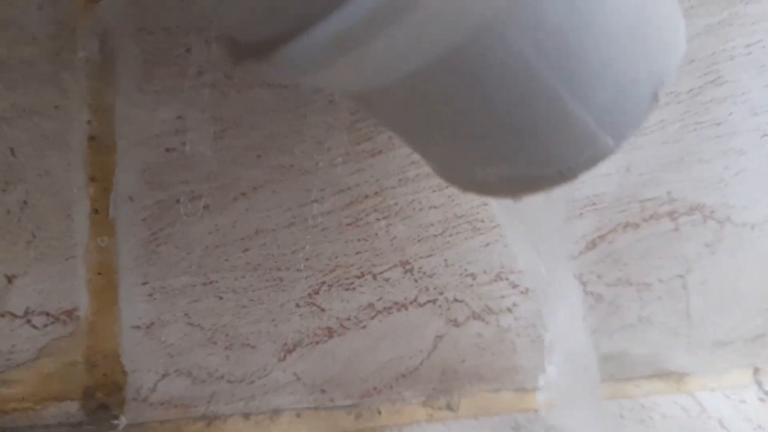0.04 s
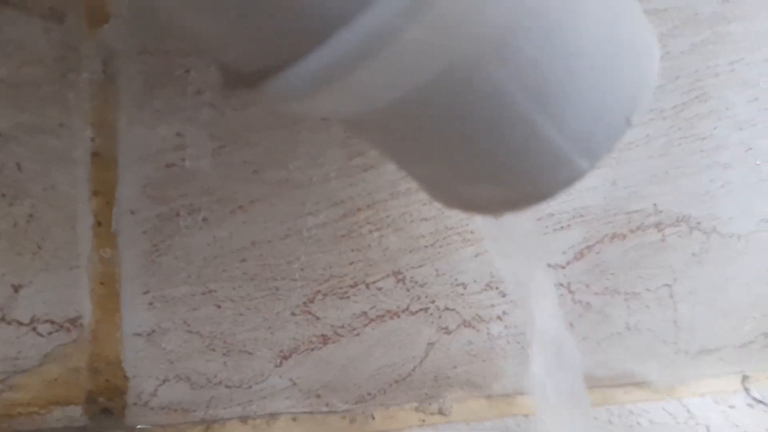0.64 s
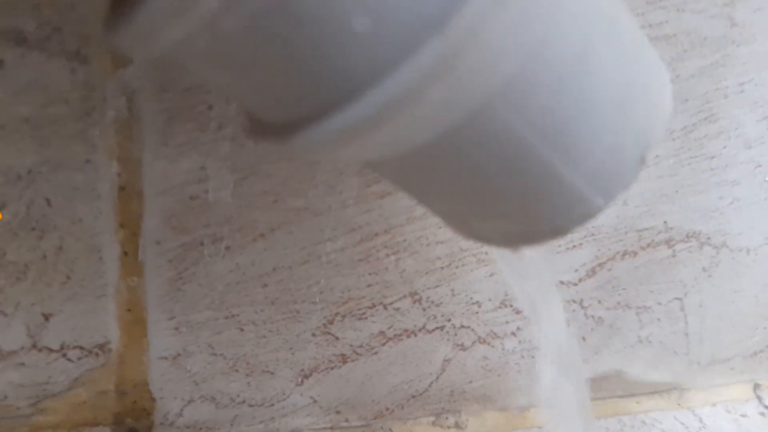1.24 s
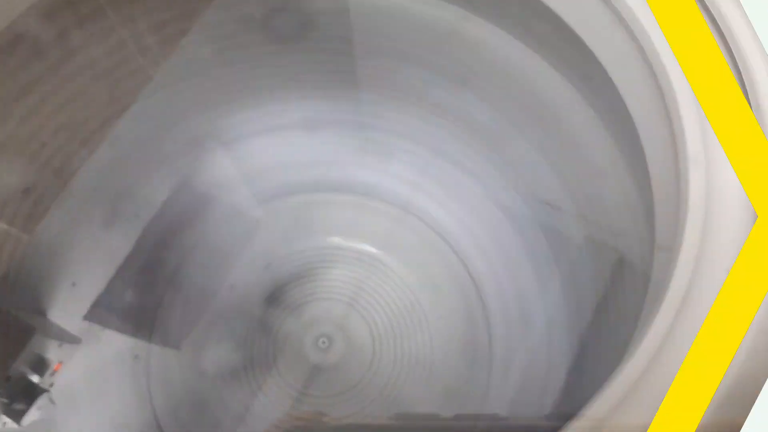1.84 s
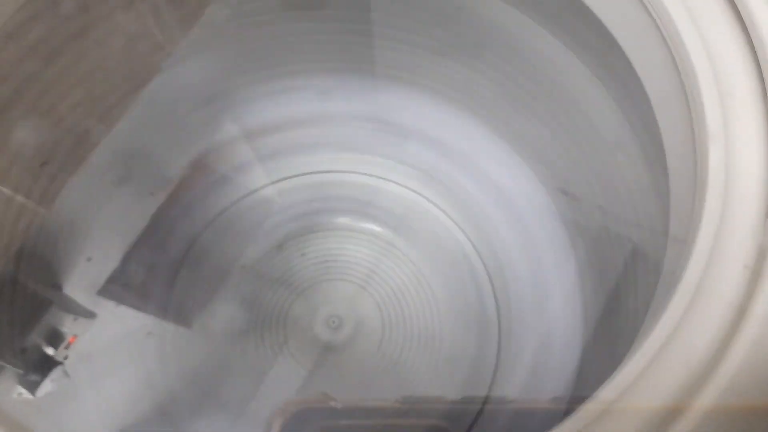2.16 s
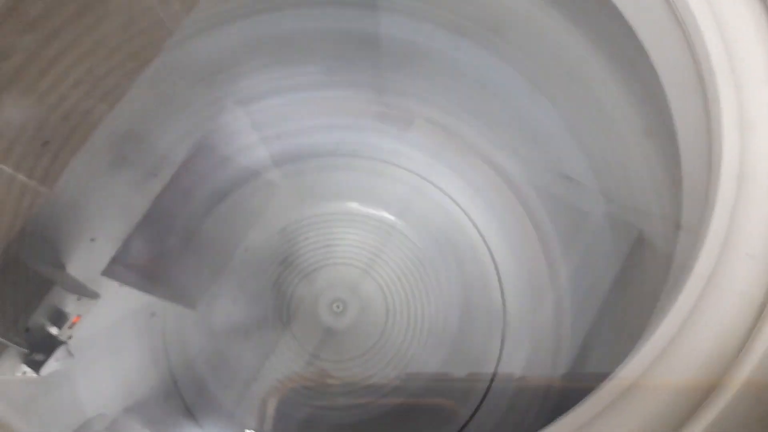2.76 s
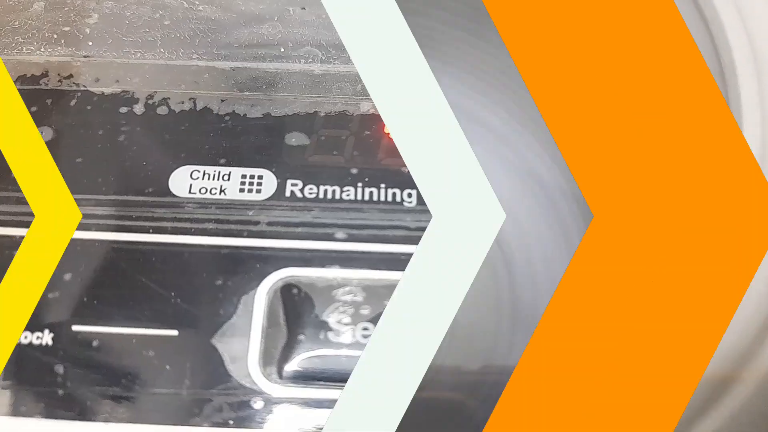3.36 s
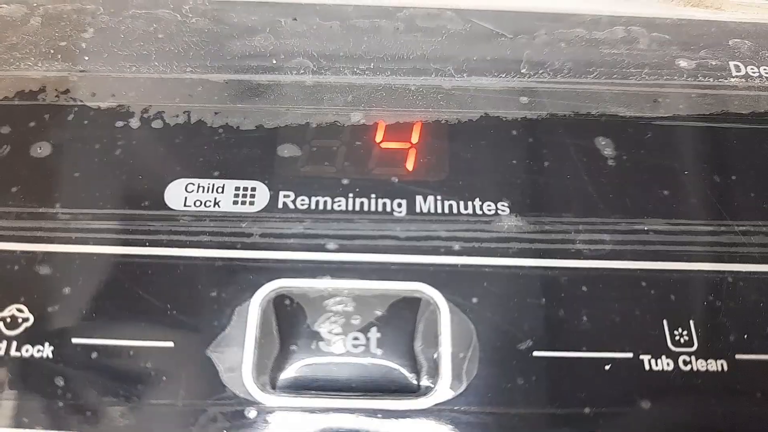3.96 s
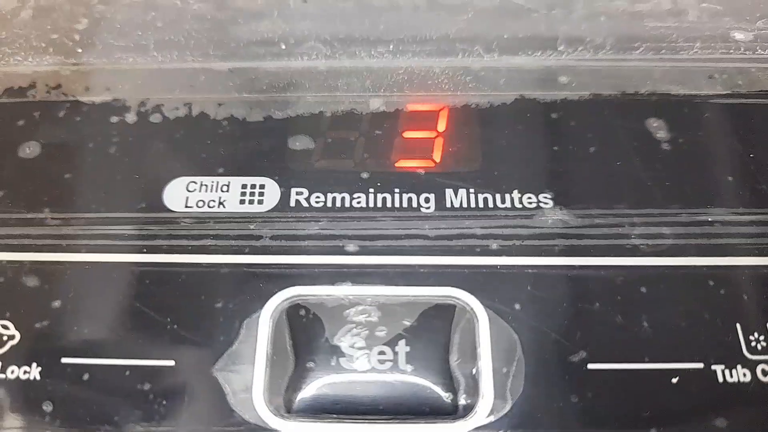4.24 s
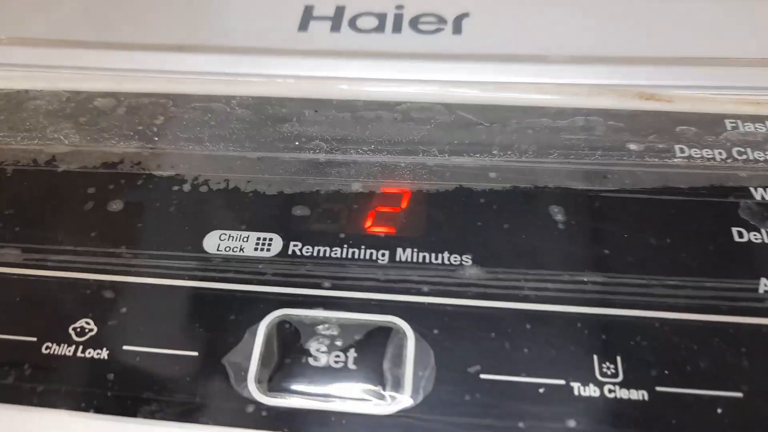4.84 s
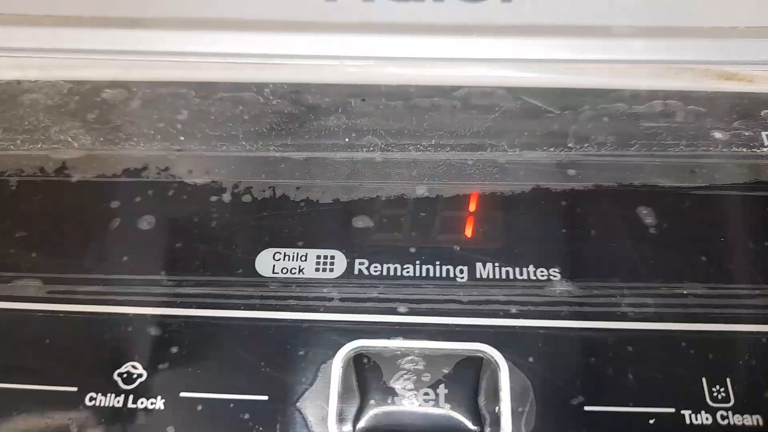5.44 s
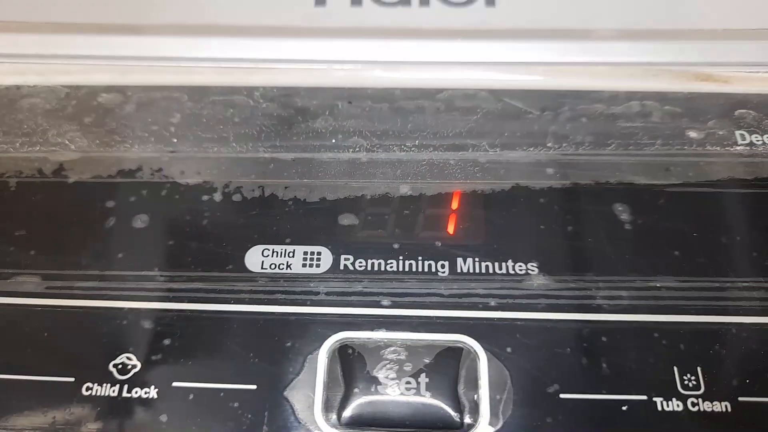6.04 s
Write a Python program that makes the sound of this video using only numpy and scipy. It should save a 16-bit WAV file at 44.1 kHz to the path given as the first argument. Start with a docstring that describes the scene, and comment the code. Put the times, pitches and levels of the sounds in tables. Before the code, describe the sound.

At first the microphone is at the drain pipe of a spinning washing machine: water splashes onto the floor over a low drone and a fast, pulsing rattle. At about 1 second the pipe gives a hollow clonk and the machine lands with a heavy thud, with a short surge of spray and rattle. Several lighter thuds follow until 1.6 seconds. Between 1.5 and 2 seconds the sound fades to the open drum: a steady motor hum, a drum drone and a wavering cabinet vibration. Around 3.5 seconds the tone shifts as the microphone reaches the control panel, and the drone grows a little stronger. At 4.7 seconds the sound drops out for an instant between two ticks, then the hum resumes. At 5.5 seconds a sharp click starts a much louder, closer, wider hum, which lasts to the end, with faint thin squeals around 6 seconds.

```python
"""At the drain pipe of a spinning top-loading washing machine, water splashes out, the pipe clonks and
the machine thuds and rocks. We then listen over the open drum, at the control panel and further back.
The off-balance drum drones, the motor hums with the mains power, and both shake the cabinet.
The sound drops out for an instant, and near the end it jumps to a much louder, closer hum."""
import sys
import numpy as np
from scipy import signal
from scipy.fft import rfft, irfft, next_fast_len
from scipy.io import wavfile

SR = 44100
rng = np.random.default_rng(int(sys.argv[2]) if len(sys.argv) > 2 else 0)


def unload_wav(signal):
    """Save mono or channel-first audio to the path in sys.argv[1] as 16-bit WAV at rate SR, clipped to [-1, 1]."""
    wavfile.write(
        sys.argv[1],
        SR,
        np.round(np.clip(np.atleast_2d(signal).T, -1, 1) * 32767).astype(np.int16),
    )


N = 268436
T = np.arange(N) / SR

# The five listening places, in order: drain pipe, over the drum, control panel, further back, close up.
# fades from the first place to the second, and on to the third: (middle [s], length [s])
PLACE_FADES = [(1.742, 0.51), (3.45, 0.73)]
DROPOUT_S = (4.6726, 4.7058)   # start and end; halfway through, we move further back
CLOSE_UP_S = 5.4725

# hiss that both ears share: (frequency [Hz], relative level [dB])
HISS_COLOUR = [(30, -2.5), (3000, -1), (8000, 2.5), (12000, 0.5), (16000, -2)]
# hiss that differs between the ears: (frequency [Hz], relative level [dB])
HISS_SIDE_COLOUR = [(3500, -51), (5500, -3), (8000, -0.5), (16000, -2.5)]
# squeals of the moving parts: (middle [s], half length [s], pitch [Hz], width [Hz], level [dB])
GEAR_SQUEALS = [(4.03, .16, 3130, 70, -68), (5.93, .035, 3780, 90, -55), (5.94, .06, 3530, 70, -58),
                (5.93, .06, 4530, 90, -61), (6.03, .045, 2650, 250, -48)]
# splashing water: (frequency [Hz], relative level [dB])
WATER_COLOUR = [(500, 4.5), (1000, -7.5), (1700, 1.5), (2400, -0.5), (3200, -1.5), (4400, -7),
                (5500, -10.5), (7500, -20), (15000, -31)]
# bursts of spray and small ticks: (time [s], level [dB], centre [Hz], rise and fall time [s])
SPRAY_BURSTS = [(1.046, -51, 2980, 0.014), (1.057, -53, 6000, 0.004), (1.075, -39, 3070, 0.0075),
                (1.076, -48, 5740, 0.0057), (1.086, -41, 1600, 0.0097), (1.173, -39.5, 1550, 0.0064),
                (1.25, -51, 3500, 0.0081), (1.263, -54, 7000, .003), (1.46, -59, 7000, 0.0044),
                (2.938, -58, 4970, 0.02), (4.176, -50.5, 3800, 0.0027)]
# rattle heard through the drain pipe: (frequency [Hz], relative level [dB])
RATTLE_COLOUR = [(25, -40), (50, -25), (85, 3.5), (130, -5.5), (195, -11), (235, -2.5), (300, -6.5),
                 (375, -7), (480, -15), (620, -18.5), (1050, -25), (1500, -30), (2200, -50), (5000, -69)]
# how the rattle pulses as the drum turns: (multiple of the turning rate, depth)
RATTLE_PULSES = [(1, .15), (2, .24), (4, .18), (6, .1), (8, .1)]
# air ringing in the pipe: (pitch [Hz], width [Hz], level relative to the rumble [dB])
PIPE_AIR_TONES = [(235, 4.5, -10), (391.4, 7, -14), (997, 22, -24.5), (1095, 12, -28.5), (1340, 25, -34),
                  (1600, 33, -30.5), (1980, 18, -36), (3190, 160, -37)]
# hollow knocks of the pipe: (time [s], level [dB])
PIPE_KNOCKS = [(1.017, -22.5), (1.029, -18.5), (1.047, -20.5), (1.076, -24.5)]
# tones of the knocked pipe: (pitch [Hz], relative level [dB], time to fade by 60 dB [s])
KNOCK_TONES = [(371, -2.5, 0.17), (552, 2.5, 0.041), (693, 0, 0.12), (785, -9, 0.055), (1030, -21, 0.056),
               (1640, -19, 0.053)]
# heavy thuds of the rocking machine: (time [s], level [dB], boom pitch [Hz])
ROCKING_THUDS = [(1.078, 3, 84.8), (1.173, -10.5, 92), (1.282, -6.5, 96.5), (1.457, -8.5, 98.7),
                 (1.548, -10, 98.5), (1.608, -11.5, 99.4)]
# tones above each boom: (pitch [Hz], relative level [dB], time to fade by 60 dB [s])
THUD_TONES = [(233.4, -14, 0.41), (301, -20, 0.23), (353, -18.5, 0.11), (479, -19, .1)]
# rumble of the spinning machine: (frequency [Hz], relative level [dB])
SPIN_COLOUR = [(25, -28.5), (60, -5.5), (95, -13.5), (145, -4.5), (220, 1), (340, -3.5), (450, -6),
               (560, -13.5), (800, -15), (1200, -20.5), (1800, -30), (2800, -43), (4800, -47.5),
               (9000, -59)]
# the same rumble close up: (frequency [Hz], relative level [dB])
CLOSE_SPIN_COLOUR = [(25, -28), (60, -23.5), (100, -6), (200, -2), (300, 1), (430, -5), (560, -10.5),
                     (780, -17.5), (1050, -21), (1500, -29), (2200, -32), (3100, -43), (5200, -47),
                     (7200, -48)]
# off-balance drum, relative levels: (multiple of the turning rate, at the pipe [dB], at the machine [dB])
DRUM_TONES = [(2.93, -58, -46), (4.92, -30.5, -47), (6.997, -34, -35.5), (9.02, -28.5, -30),
              (10.67, -52, -46), (19.23, -36.5, -48), (29.6, -41, -63), (31.5, -45, -64.5)]
# shaken cabinet, relative levels:
# (pitch [Hz], width [Hz], over the drum [dB], at the control panel [dB], close up [dB])
CABINET_TONES = [(92.55, 4.2, -34, -41, -23), (88, 2.7, -35.5, -52, -31), (169.3, 3.9, -44, -46, -28),
                 (213.9, 3.6, -48, -39.5, -25), (240.8, 8, -40.5, -42, -31), (284.5, 3.1, -45.5, -57, -28),
                 (308.8, 4.6, -44, -45.5, -21), (367, 3.1, -41.5, -37, -42), (391.4, 2, -45.5, -55, -34),
                 (454, 23, -46, -49, -35.5), (509, 3.3, -56, -55.5, -40), (670, 5.3, -61, -47.5, -38.5),
                 (765.4, 23, -52.5, -50, -41)]
# motor hum, relative levels:
# (multiple of the mains frequency, over the drum [dB], at the control panel [dB], close up [dB])
MOTOR_TONES = [(2, -31, -36.5, -22), (4, -25, -24.5, -17.5), (6, -36, -47.5, -25), (8, -47, -52, -28),
               (10, -47, -67, -53), (12, -74, -53, -49.5), (14, -55.5, -43, -36.5)]
# one row per place after the pipe: (rumble level [dB], motor and cabinet gain [dB], drum gain [dB])
SPIN_MIX = [(-29.5, 0.5, -5.5), (-29, 1, 0.5), (-28, -0.6, -5.5), (-21, .5, 8.5)]
# reflections close up: (frequency [Hz], level relative to the direct sound [dB])
REFLECTION_COLOUR = [(40, -18), (100, -8), (200, -14.5), (380, -8.5), (700, -4), (1300, 3), (15000, -2.5)]


def from_db(db):
    """Turn decibels into a number to multiply by."""
    return 10 ** (np.asarray(db) / 20)


def unit_power(x):
    """Scale a signal to an average power of 1."""
    return x / np.sqrt(np.mean(x ** 2) + 1e-20)


def gain_at(colour, hz):
    """Read the gain at any frequency from a table of levels."""
    table_hz, table_db = np.transpose(colour)
    return from_db(np.interp(np.log(hz + 1), np.log(table_hz), table_db))


def drift(rate_hz):
    """A smooth random wobble, about 1 in size; a higher rate wobbles faster."""
    hz = np.fft.rfftfreq(8192, 1 / 1000)
    slow = irfft(rfft(rng.standard_normal(8192)) / (1 + (hz / rate_hz) ** 2))
    return np.interp(T * 1000, np.arange(len(slow)), unit_power(slow))


def coloured(colour, top_hz=20000, source=None):
    """Give noise, or another source, a colour: its balance of low and high frequencies."""
    size = next_fast_len(N)
    hz = np.fft.rfftfreq(size, 1 / SR)
    gain = gain_at(colour, hz) / np.sqrt(1 + (hz / top_hz) ** 60)
    if source is None:
        source = rng.standard_normal(N)
    return unit_power(irfft(gain * rfft(source, size), size)[:N])


def tone(hz, wander):
    """A pure tone that runs ahead or behind by `wander` radians."""
    return np.sqrt(2) * np.sin(2 * np.pi * (hz * T + rng.random()) + wander)


def resonance(hz, width_hz):
    """Ringing stirred at random; the wider it is, the more it sounds like noise."""
    phase = 2 * np.pi * hz * T
    return drift(width_hz) * np.cos(phase) + drift(width_hz) * np.sin(phase)


def ring(start_s, tones, rise_s):
    """A struck object rings; a soft contact lets its tones swell before they die away."""
    age = np.clip(T - start_s, 0, None)[:int((start_s + 1) * SR)]
    ringing = sum(from_db(db - 60 * age / fade_s) * np.sin(2 * np.pi * hz * age)
                  for hz, db, fade_s in tones)
    swell = 1 - np.exp(-(age / rise_s) ** 2)
    return np.pad(ringing * swell, (0, N - len(age)))


def listening_places():
    """How much of each place we hear at each moment, from 0 to 1."""
    fades = [np.clip((T - middle) / length + .5, 0, 1) for middle, length in PLACE_FADES]
    reached = [np.ones(N), *fades, T >= np.mean(DROPOUT_S), T >= CLOSE_UP_S, np.zeros(N)]
    return np.clip(-np.diff(np.array(reached, float), axis=0), 0, 1)


def noise_gain(places, levels_db):
    """Follow one level per place; powers add, so the sound sags in the middle of a fade."""
    return np.sqrt(from_db(levels_db) ** 2 @ places ** 2)


def hum_gain(places, hum_db, over_drum, at_panel, close):
    """Follow one tone's level without sagging; further back uses the control panel's balance."""
    return from_db(hum_db + [over_drum, at_panel, at_panel, close]) @ places


def surge(rise_s=0.037, ebb_s=0.16):
    """The heaviest thud sets off a surge of rattle and water: it swells to 1, then ebbs."""
    age = T - max(ROCKING_THUDS, key=lambda thud: thud[1])[0]
    return np.exp(-np.minimum(np.where(age < 0, (age / rise_s) ** 2, age / ebb_s), 20))


def hiss(places, colour, db):
    """A faint hiss, the same at every place."""
    return noise_gain(places, [db] * len(places)) * coloured(colour)


def squeals():
    """The moving parts give thin squeals that swell and fade."""
    return sum(from_db(db) * np.exp(-np.minimum(((T - middle) / half) ** 2, 20)) * resonance(hz, width)
               for middle, half, hz, width, db in GEAR_SQUEALS)


def water(places, drops_per_s=8000, size_db=2.0, stream_db=-51, tub_db=-60, through_lid_db=-76.5):
    """Thousands of tiny, uneven splashes: the stream on the floor, later faint spray in the tub."""
    level = noise_gain(places, [stream_db, tub_db] + [through_lid_db] * 3)
    landings = rng.random(N) < drops_per_s / SR
    sizes = from_db(size_db * np.minimum(rng.exponential(1, N), 4))
    drops = landings * sizes * rng.choice([-1, 1], N)
    flow = from_db(3.5 * surge() + 0.5 * drift(20))
    return level * flow * coloured(WATER_COLOUR, source=drops)


def spatters():
    """Spray and small ticks: short bursts of noise, each an octave wide."""
    bursts, noise = np.zeros(N), rng.standard_normal(N)
    for time_s, db, hz, fade_s in SPRAY_BURSTS:
        edges_hz = [hz / np.sqrt(2), min(hz * np.sqrt(2), SR / 2 - 1)]
        band = signal.butter(3, edges_hz, "band", fs=SR, output="sos")
        shape = np.exp(-np.minimum(np.abs(T - time_s) / fade_s, 20))
        bursts += from_db(db) * shape * unit_power(signal.sosfilt(band, noise))
    return bursts


def drain_rumble(at_pipe, turn_hz=11.78, level_db=-29, surge_db=6.5, drone_gain_db=28, waver_db=0.7):
    """Through the pipe the drum drones, the air rings and a rattle pulses with each turn."""
    sway = 0.055 * drift(1.3)
    drone = sum(from_db(db + waver_db * drift(4.4)) * tone(k * turn_hz, k * sway)
                for k, db, _ in DRUM_TONES)
    pipe_air = sum(from_db(db) * resonance(hz, width) for hz, width, db in PIPE_AIR_TONES)
    pulsing = 1 + sum(depth * np.cos(2 * np.pi * k * turn_hz * T) for k, depth in RATTLE_PULSES)
    rattle = from_db(-0.5) * pulsing * coloured(RATTLE_COLOUR)
    level = at_pipe * from_db(level_db + surge_db * surge())
    return level * (rattle + pipe_air + from_db(drone_gain_db) * drone)


def pipe_knocks():
    """Quick knocks make the hollow pipe clonk."""
    return sum(from_db(db) * ring(time_s, KNOCK_TONES, rise_s=0.0015) for time_s, db in PIPE_KNOCKS)


def thuds(boom_fade_s=0.23):
    """The machine lands with a heavy boom and rocks a few times."""
    return sum(from_db(db) * ring(time_s, [(hz, 0, boom_fade_s)] + THUD_TONES, rise_s=0.016)
               for time_s, db, hz in ROCKING_THUDS)


def spin_rumble(places, rumble_db, tremble_db=0.5):
    """The spinning machine's low, trembling noise, which changes colour close up."""
    noise = np.where(T < CLOSE_UP_S, coloured(SPIN_COLOUR), coloured(CLOSE_SPIN_COLOUR, top_hz=7300))
    return noise_gain(places, rumble_db) * from_db(tremble_db * drift(23)) * noise


def drum_drone(places, drum_db, turn_hz=13.78, waver_db=3.0):
    """The off-balance drum drones on tones tied to how fast it turns."""
    sway = 0.079 * drift(0.73)
    drone = sum(from_db(db + waver_db * drift(3.6)) * tone(k * turn_hz, k * sway)
                for k, _, db in DRUM_TONES)
    return noise_gain(places, drum_db) * drone


def cabinet(places, hum_db, waver_db=3.5):
    """Shaken by motor and drum, the cabinet's walls ring unsteadily at their own pitches."""
    ringing = np.zeros(N)
    for hz, width, *levels_db in CABINET_TONES:
        waver = from_db(waver_db * drift(width))
        ringing += hum_gain(places, hum_db, *levels_db) * waver * tone(hz, drift(width / 2))
    return ringing


def motor_hum(places, hum_db, mains_hz=49.8, waver_db=1.7):
    """The motor's magnetic pull comes twice per mains cycle, so its tones peak together."""
    phase = 2 * np.pi * mains_hz * T + 0.03 * drift(1.4)
    hum = np.zeros(N)
    for k, *levels_db in MOTOR_TONES:
        waver = from_db(waver_db * drift(18.0))
        hum += hum_gain(places, hum_db, *levels_db) * waver * np.cos(k * phase)
    return -np.sqrt(2) * hum


def spinning(places):
    """Motor, drum, cabinet and rumble together, at the four places after the pipe."""
    rumble_db, hum_db, drum_db = np.transpose(SPIN_MIX)
    tones = motor_hum(places, hum_db) + drum_drone(places, drum_db) + cabinet(places, hum_db)
    return tones + spin_rumble(places, rumble_db)


def click(time_s, db, decay_s=0.00068):
    """A sudden step in pressure that falls back at once."""
    return from_db(db) * (T >= time_s) * np.exp(-np.minimum(np.abs(T - time_s) / decay_s, 20))


def interrupt(x, dropout_db=-42, tick_db=-21, close_click_db=-6.5, settle_s=0.0016):
    """The sound drops out between two ticks; later the close hum starts with a sharp click."""
    start, end = DROPOUT_S
    dropout = np.clip(np.maximum(start - T, T - end) / settle_s, from_db(dropout_db), 1)
    dip_at_click = 1 - np.exp(-np.minimum(((T - CLOSE_UP_S) / settle_s) ** 2, 20))
    clicks = click(start, tick_db) + click(end, tick_db) + click(CLOSE_UP_S, close_click_db)
    return x * dropout * dip_at_click - clicks


def widen(x, scatter_s=0.014):
    """Centred at first; close up, reflections reach the ears with a different delay at each pitch."""
    size = next_fast_len(N + SR // 2)
    hz = np.fft.rfftfreq(size, 1 / SR)
    points_hz = np.geomspace(30, SR / 2, num=200)
    delay_s = scatter_s * np.interp(hz, points_hz, rng.uniform(0, 3.7, len(points_hz)))
    reflections = gain_at(REFLECTION_COLOUR, hz) * np.exp(-2j * np.pi * np.cumsum(delay_s) * hz[1])
    close_part = x * np.clip((T - CLOSE_UP_S) / scatter_s - .5, 0, 1)
    side = irfft(reflections * rfft(close_part, size), size)[:N]
    return np.array([x + side, x - side])


def scene():
    """Mix hiss, drain, knocks and the spinning machine for the left and right ears."""
    places = listening_places()
    shared_hiss = hiss(places, HISS_COLOUR, db=-62)
    side_hiss = hiss(places, HISS_SIDE_COLOUR, db=-69)
    drain = drain_rumble(places[0]) + water(places) + spatters() + pipe_knocks()
    machine = thuds() + spinning(places[1:]) + squeals()
    return widen(interrupt(shared_hiss + drain + machine)) + side_hiss * [[1], [-1]]


def record(dry, cutoff_hz=15800):
    """Round off the tallest peaks and remove the very highest treble."""
    rounded = dry / (1 + dry ** 10) ** (1 / 10)
    low_pass = signal.ellip(10, .1, 80, cutoff_hz, fs=SR, output="sos")
    return signal.sosfilt(low_pass, rounded)


dry = scene()
out = record(dry)
unload_wav(out)
```